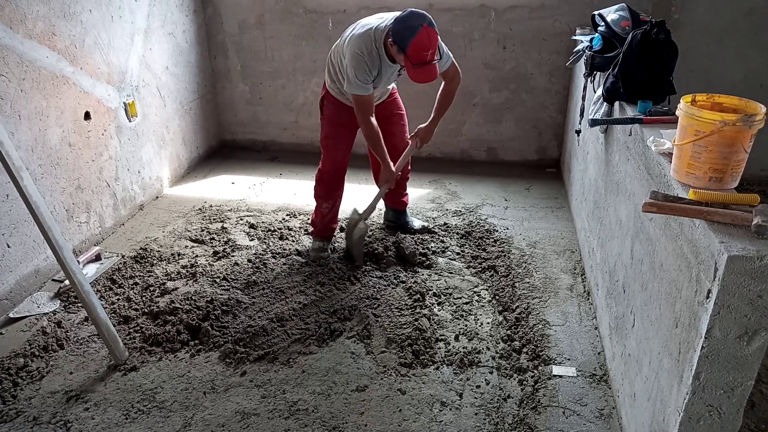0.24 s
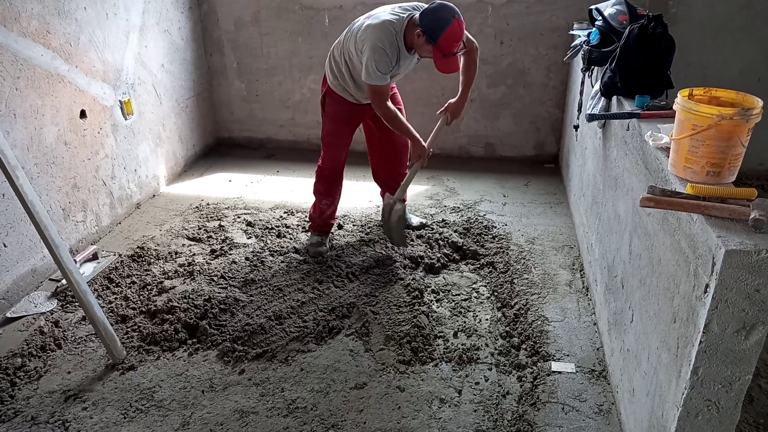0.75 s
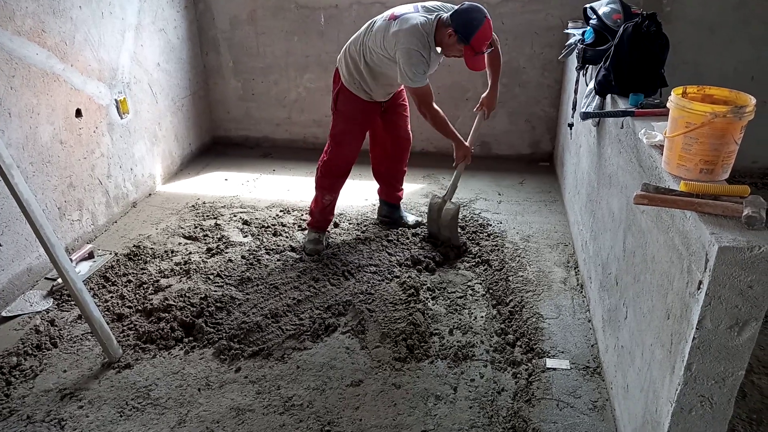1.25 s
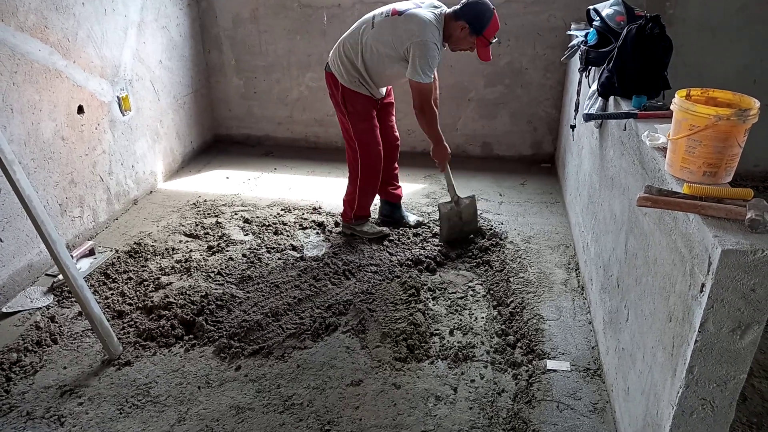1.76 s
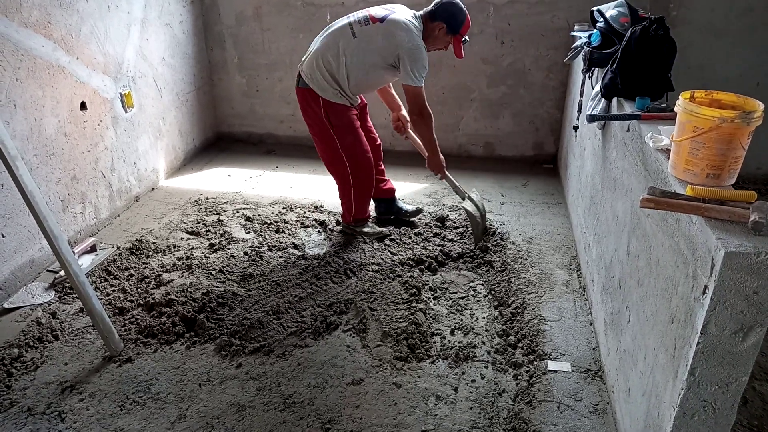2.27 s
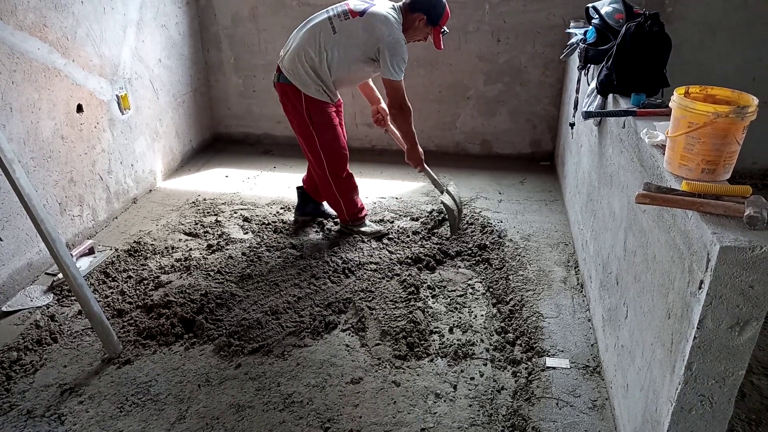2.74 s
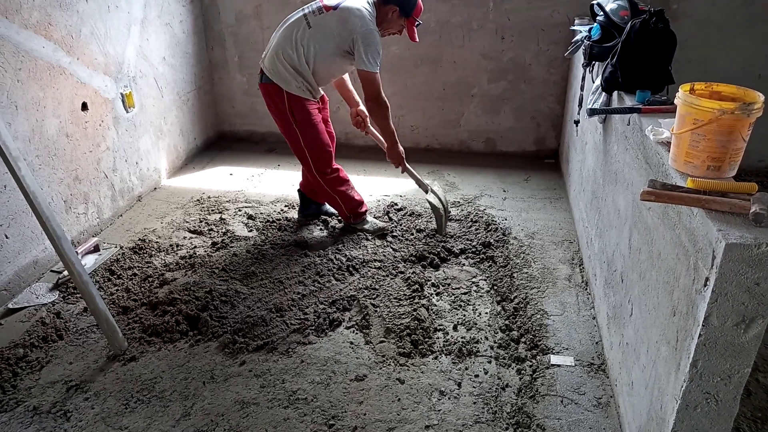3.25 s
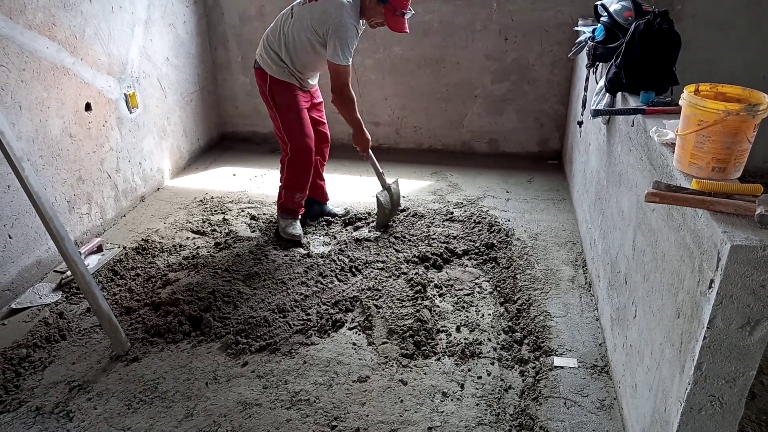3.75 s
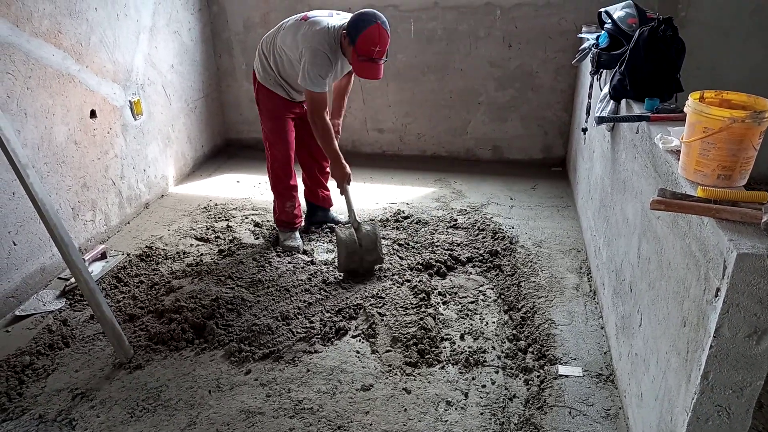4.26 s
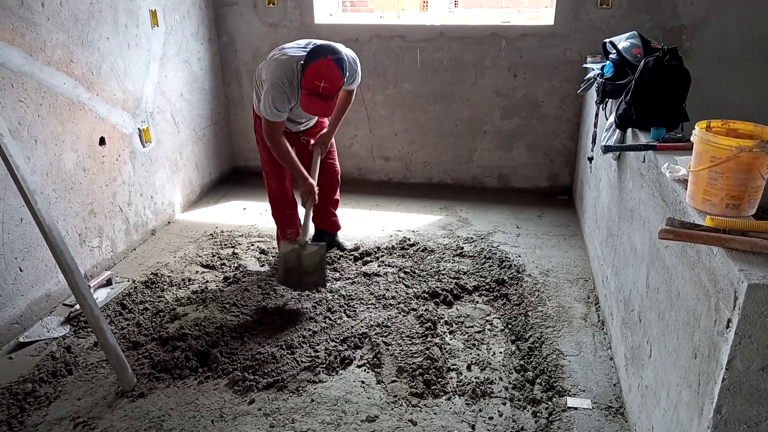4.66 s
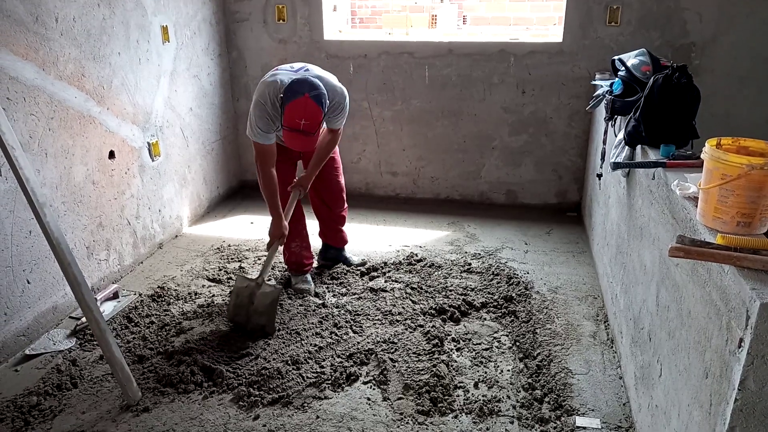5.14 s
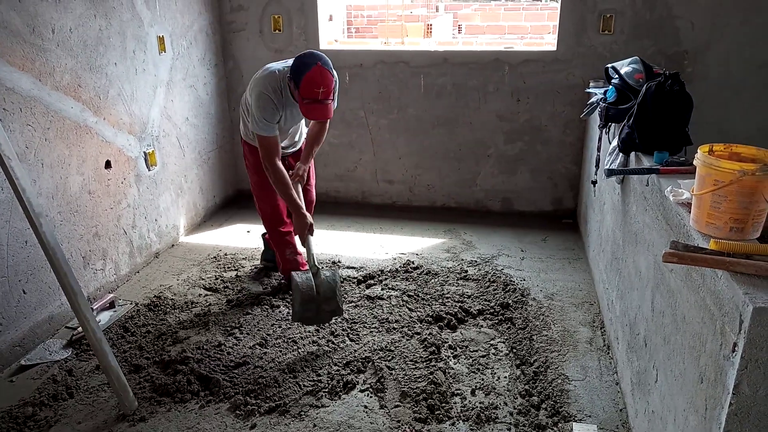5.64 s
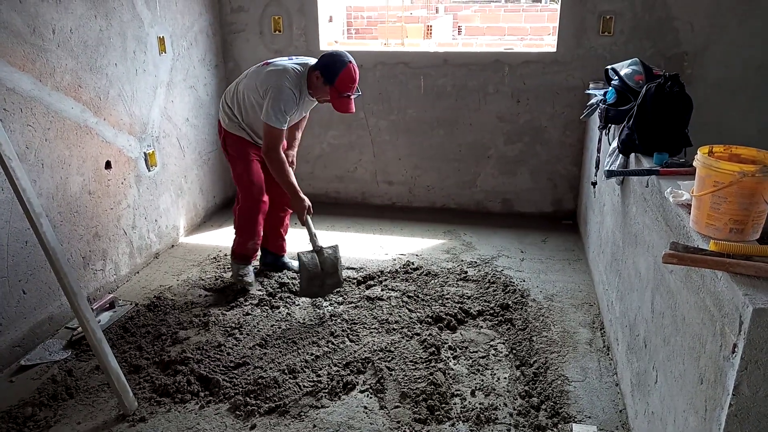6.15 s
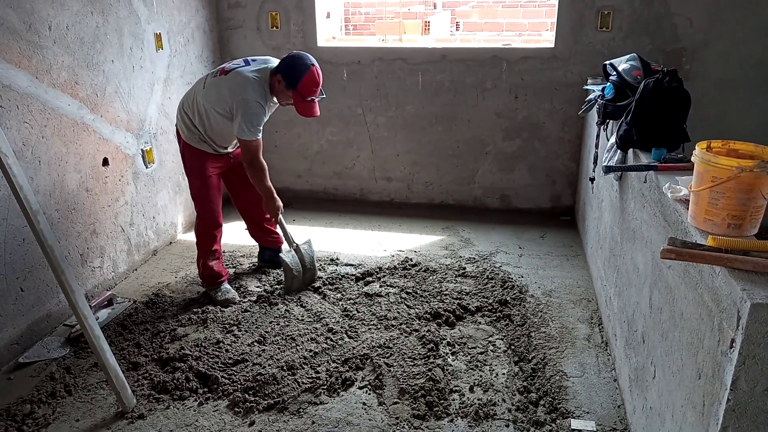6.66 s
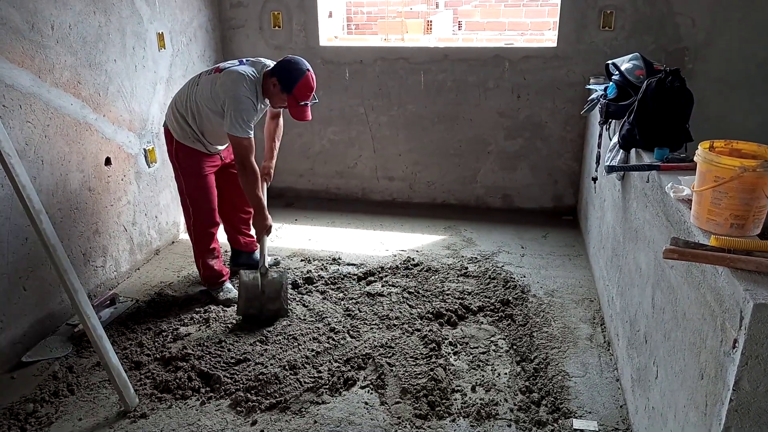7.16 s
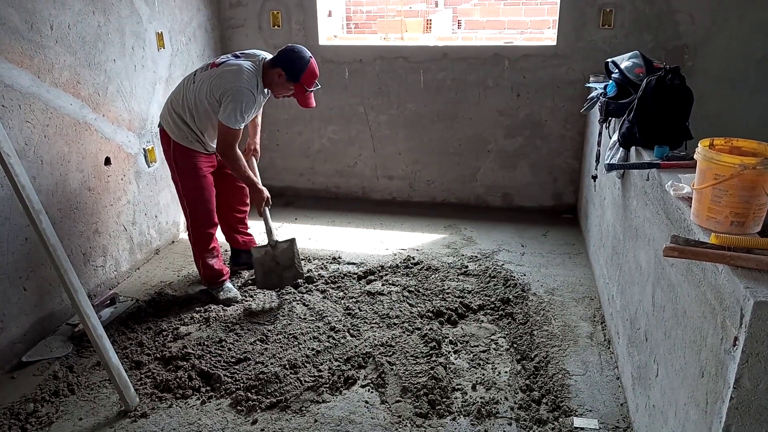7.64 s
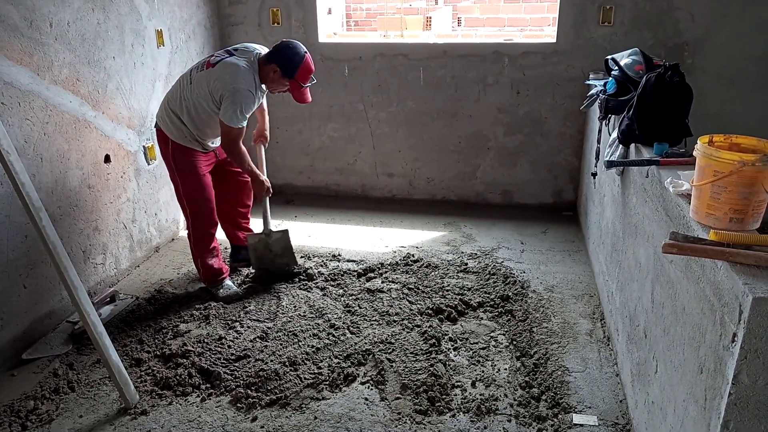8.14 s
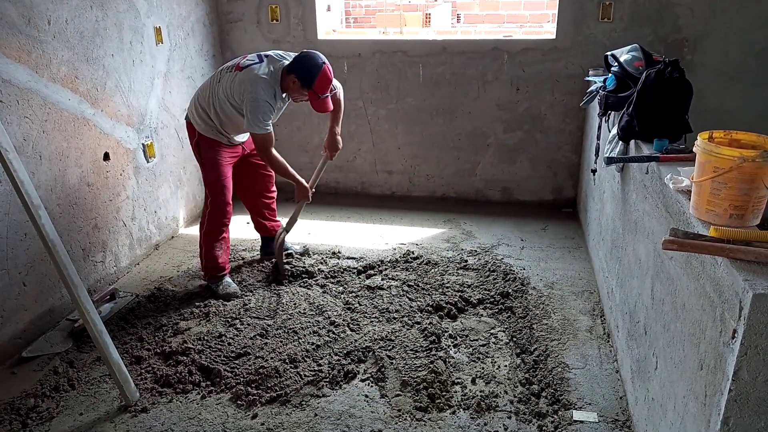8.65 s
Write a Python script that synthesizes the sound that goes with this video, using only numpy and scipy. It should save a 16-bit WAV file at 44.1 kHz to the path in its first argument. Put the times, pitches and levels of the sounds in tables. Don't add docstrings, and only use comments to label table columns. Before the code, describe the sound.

A steel shovel clangs on a concrete slab and scrapes through damp mortar in a bare, echoing room, with small handle squeaks and soft lumps dropping.

```python
import sys
import numpy as np
from scipy import signal
from scipy.fft import rfft, irfft, next_fast_len
from scipy.io import wavfile
from scipy.ndimage import uniform_filter1d, map_coordinates

SR = 44100
rng = np.random.default_rng(int(sys.argv[2]) if len(sys.argv) > 2 else 0)


def digitize_waveform(pressure):
    field = np.atleast_2d(pressure).T
    bounded = np.clip(field, -1, 1)
    quanta = np.round(bounded * 32767).astype(np.int16)
    wavfile.write(sys.argv[1], SR, quanta)


def invert_db(level):
    return 10 ** (np.asarray(level, dtype=float) / 20)


N = 392490
STEP = 16


def unit(x):
    return x / np.sqrt(np.mean(x ** 2) + 1e-20)


def along(points, hz):
    f, v = np.transpose(points)
    return np.interp(np.log(hz + 1), np.log(f + 1), v)


def filtered(x, response):
    m = next_fast_len(len(x) + 8192)
    return irfft(rfft(x, m) * response(np.fft.rfftfreq(m, 1 / SR)), m)[:len(x)]


def coloured(x, spectrum):
    return unit(filtered(x, lambda f: invert_db(along(spectrum, f))))


def modes(table):
    def response(f):
        return sum((-1) ** k * invert_db(db) * 1j * f * w / (c * c - f * f + 1j * f * w)
                   for k, (c, w, db) in enumerate(table))
    return response


def steep(f, hz, width, db):
    return modes([(hz, width, db)])(f) * modes([(hz, 5 * width, 0)])(f)


def wobble(rate):
    knots = rng.standard_normal(int(N * rate / SR) + 4)
    return map_coordinates(knots, [np.arange(N) * rate / SR])


def grains(n, share, spread_db):
    draw = rng.random((3, n))
    size = invert_db(-spread_db * np.log(draw[2] + 0.009))
    return unit((draw[0] < share) * np.sign(draw[1] - .5) * size)


def patchy(x, depth_db):
    z = signal.stft(x, nperseg=512)[2]
    field = uniform_filter1d(rng.standard_normal(z.shape), 9, 0)
    field = uniform_filter1d(field, 7, 1)
    return unit(signal.istft(z * invert_db(depth_db * unit(field)), nperseg=512)[1][:len(x)])


def even(x):
    z = rfft(x)
    return irfft(z / np.sqrt(uniform_filter1d(np.abs(z) ** 2, size=9) + 1e-12), len(x))


def burst(s, db, rise_s, fall_db_per_s):
    since = np.clip(np.arange(0, N + STEP, STEP) / SR - s, 0, 2)
    return (invert_db(db - fall_db_per_s * since) * (1 - np.exp(-since / rise_s))) ** 2


def gain(power):
    return np.interp(np.arange(N) / STEP, np.arange(len(power)), np.sqrt(power))


def add(track, s, x):
    part = track[round(s * SR):][:len(x)]
    part += x[:len(part)]


# frequency_hz, t60_s
WALL_DECAY = [(300, 1), (1500, 0.54), (3500, 0.3), (8000, 0.22), (15000, 0.088)]


def room(x, wet_db):
    hz, t, z = signal.stft(rng.standard_normal(SR // 2), SR, nperseg=256)
    decay = invert_db(-60 * t / along(WALL_DECAY, hz)[:, None])
    tail = signal.istft(z * decay, SR, nperseg=256)[1]
    tail = np.pad(tail / np.linalg.norm(tail), (round(.005 * SR), 0))
    tail[0] = invert_db(-wet_db)
    return invert_db(wet_db) * signal.fftconvolve(x, tail)


# frequency_hz, density_db_per_hz
OUTDOOR_SPECTRUM = [(180, -28.5), (270, -13.5), (355, -7.5), (450, -8), (600, -49), (900, -9), (1250, -2.5),
                    (2500, -5.5), (5500, -14), (12000, -28), (15000, -19), (16000, -41)]


def outdoors():
    return invert_db(-48.0 + 0.2 * wobble(2.9)) * coloured(rng.standard_normal(N), OUTDOOR_SPECTRUM)


# loudest_s, slump_level_db, room_boom_level_db
LUMP_LANDINGS = [(0.22, -51.5, -67), (0.35, -56.5, -79), (0.64, -49, -63.5), (1.0, -52, -70),
                 (1.48, -53.5, -68), (1.96, -47.5, -63.5), (2.3, -51.5, -69), (2.65, -52.5, -76),
                 (3.15, -79, -73), (3.37, -62, -83), (3.85, -82, -76), (4.29, -53.5, -77),
                 (4.56, -56.5, -74), (4.93, -73, -71), (5.06, -56, -81), (5.45, -48, -80), (5.55, -65, -69),
                 (5.9, -61, -70), (6.17, -80, -68), (6.32, -59, -68), (6.6, -55, -68), (6.82, -52, -73),
                 (7.21, -48.5, -63.5), (7.58, -50, -80), (7.93, -50, -83), (8.08, -52, -67.5),
                 (8.3, -56, -80), (8.55, -55, -72), (8.8, -51, -70)]
# frequency_hz, density_db_per_hz
SLUMP_SPECTRUM = [(120, -57), (205, -29), (245, -2.5), (300, -4), (355, 4.5), (420, -1), (520, 1.5),
                  (650, 1), (900, -50), (1500, -90)]
# frequency_hz, density_db_per_hz
BOOM_SPECTRUM = [(15, -30), (25, -8), (32, -14), (60, -7), (97, -7.5), (130, -11), (162, 6), (210, -13),
                 (270, -37), (460, -120)]


def heap():
    rise_s = 0.083
    wet, low = invert_db(-72) ** 2, invert_db(-84) ** 2
    for s, slump_db, boom_db in LUMP_LANDINGS:
        wet = wet + burst(s - rise_s, slump_db + 3.5, rise_s, fall_db_per_s=40.5)
        low = low + burst(s - rise_s, boom_db + 7.5, rise_s, fall_db_per_s=60)
    lumps = grains(N, share=.01, spread_db=0.0)
    slump = gain(wet) * invert_db(4.0 * wobble(24)) * coloured(lumps, SLUMP_SPECTRUM)
    boom = gain(low) * invert_db(7.1 * wobble(6.9)) * coloured(rng.standard_normal(N), BOOM_SPECTRUM)
    return slump + boom


# loudest_s, lead_in_s, pitch_hz, level_db, overtones_db
SOCKET_SLIPS = [(0.155, 0.01, 2920, -39.5, 9), (0.951, 0.043, 2955, -41.5, 11),
                (0.993, 0.011, 2925, -47, -9), (1.639, 0.008, 2990, -59, -5),
                (1.701, 0.026, 2960, -43.5, -13), (2.133, 0.012, 2998, -41, -2),
                (3.274, 0.025, 3005, -56, 15), (4.02, 0.008, 2900, -59, -7), (6.342, 0.02, 3030, -49.5, -7),
                (7.066, 0.016, 3066, -50, 8), (7.861, 0.057, 2950, -43, 4), (8.351, 0.012, 3060, -45.5, 4)]
# loudest_s, lead_in_s, pitch_hz, level_db, overtones_db
ROUGH_SLIPS = [
    (5.42, 0.015, 3000, -47, -8),
    (6.07, 0.015, 3110, -51.5, -8),
]
# multiple, level_db
SLIP_OVERTONES = [(1, 9.5), (2, -14), (3, -34), (4, -28), (5, -24)]


def squeaks():
    tail_s, sag_hz = 0.018, 61
    out = np.zeros(N)
    slips = [(*row, 18) for row in SOCKET_SLIPS] + [(*row, 400) for row in ROUGH_SLIPS]
    for s, lead, hz, db, harsh_db, waver_hz in slips:
        t = np.arange(-lead, tail_s, 1 / SR)
        before = np.clip(-t / lead, 0, 1)
        scatter = waver_hz * unit(uniform_filter1d(rng.standard_normal(len(t)), size=40))
        turn = 2 * np.pi * np.cumsum(hz + sag_hz * before + scatter) / SR
        tone = sum(invert_db(g + harsh_db * (k > 1)) * np.sin(k * turn) for k, g in SLIP_OVERTONES)
        fade = np.clip(np.minimum(t + lead, tail_s - t) / .003, 0, 1)
        level_db = db + 5.5 - 10.5 * before - 900 * np.maximum(t, 0)
        level_db += 1.3 * unit(uniform_filter1d(rng.standard_normal(len(t)), size=150))
        add(out, s - lead, room(invert_db(level_db) * fade * tone, wet_db=-6.5))
    return out


# start_s, peak_db, edge_hz, pan_mode_db, grit_db
HARD_BLOWS = [(0.0, -12.5, 3390, -9.5, -22), (0.652, -11.5, 4270, -2, -35),
              (1.4497, -13.5, 3140, -6, -10.5), (1.941, -14, 2750, -2, -5.5),
              (2.2677, -13.5, 4950, -21, -12), (2.5618, -9, 4050, -3.5, -2.5), (3.031, -7, 3475, -15, -24),
              (3.6348, -18.5, 2940, -12, -14), (4.5076, -6.5, 3480, -15, -41),
              (5.451, -7.5, 3530, -6.5, -6.5), (6.0902, -7, 3476, -10.5, -21), (6.809, -7.5, 2940, -9, -17),
              (7.5797, -9.5, 3990, -0.5, -31)]


def blow_dip_db():
    s = np.array([row[0] for row in HARD_BLOWS])
    t = np.arange(N) / SR
    since = t - s[np.maximum(np.searchsorted(s, t) - 1, 0)]
    return -9 * np.exp(-np.abs(since) / .09) * (since >= 0)


# start_s, level_db
GRAIN_SNAPS = [
    (2.172, -41),
    (4.488, -42),
    (4.905, -59),
    (5.165, -43),
    (5.7, -43),
    (7.08, -55),
    (7.835, -46),
    (8.19, -56),
]
# start_s, length_s, bite_db, push_db, blade_drag_over_grit_db
MORTAR_STROKES = [(0.27, 0.03, -47, -52, -1), (0.29, 0.4, -38.5, -46, 4.5), (1.008, 0.42, -42.5, -47.5, 3),
                  (1.755, 0.13, -45, -42.5, 6), (2.163, 0.04, -42, -55, -6), (2.335, 0.19, -48, -45.5, 4.5),
                  (2.822, 0.36, -37.5, -51.5, 6.5), (3.327, 0.29, -44.5, -45.5, 4),
                  (3.7, 0.24, -52, -61, -18), (4.233, 0.3, -35.5, -43, 4.5), (4.366, 0.05, -44, -42, 1),
                  (4.884, 0.039, -73, -58, 18), (4.991, 0.53, -43.5, -41, 3),
                  (5.804, 0.27, -35, -43.5, 2.5), (6.34, 0.23, -53.5, -53.5, 5),
                  (6.443, 0.06, -39.5, -41, 4.5), (6.515, 0.22, -61.5, -36.5, 3.5),
                  (7.062, 0.05, -52.5, -56, 13.5), (7.152, 0.026, -46, -41, -1), (7.167, 0.41, -36, -41, 4),
                  (7.895, 0.24, -39.5, -38.5, 4), (8.172, 0.08, -57, -57, 11.5), (8.36, 0.17, -62, -51, 1),
                  (8.497, 0.79, -43, -47.5, 4)]
# start_s, grit_db, blade_drag_db, fall_db_per_s
EDGE_SKIDS = [(0.0, -38.5, -23, 136), (0.655, -41, -28.5, 102), (1.45, -45.5, -37, 65),
              (1.944, -45, -23, 263), (2.27, -35.5, -21.5, 200), (2.565, -57, -20.5, 150),
              (3.034, -41.5, -27, 103), (3.635, -47.5, -47, 153), (4.508, -36.5, -24, 159),
              (5.452, -48.5, -38.5, 22), (6.09, -38, -27, 126), (6.815, -37.5, -29, 123),
              (7.582, -45, -33, 110)]


def rubbing():
    rise_s = 0.012
    t = np.arange(0, N + STEP, STEP) / SR
    grit = drag = invert_db(-67) ** 2
    fizz = sum(burst(row[0], row[1] - 31, 0.00033, 704) for row in HARD_BLOWS)
    fizz = fizz + sum(burst(s, db, .002, 900) for s, db in GRAIN_SNAPS)
    for s, length, bite_db, push_db, drag_db in MORTAR_STROKES:
        arch_db = -9 * (2 * np.clip((t - s) / length, 0, 1) - 1) ** 2
        arch_db = arch_db - 120 * np.clip(t - s - length, 0, 1)
        bite = burst(s, bite_db + 5.5, rise_s, fall_db_per_s=175)
        power = bite + burst(s, push_db, rise_s, 0) * invert_db(arch_db) ** 2
        grit = grit + power
        drag = drag + burst(s, drag_db - 0.5, rise_s, 0) * power
        fizz = fizz + burst(s, bite_db - 14, 0.0054, fall_db_per_s=211)
    for s, grit_db, drag_db, fall in EDGE_SKIDS:
        grit = grit + burst(s, grit_db, 0.00067, fall)
        drag = drag + burst(s, drag_db, 0.0013, fall)
    return gain(grit), gain(drag), gain(fizz)


# frequency_hz, density_db_per_hz
GRIT_SPECTRUM = [(1200, -54), (2100, -18), (3000, -11.5), (4300, -1.5), (7400, -4.5), (10500, -10),
                 (13300, -14), (15300, -10), (16000, -12.5)]
# frequency_hz, width_hz, level_db
DRAG_MODES = [(709, 237, 2.5), (1170, 1330, 1), (2220, 480, 5.5), (3460, 1080, 4.5), (4270, 1710, -3.5)]
# frequency_hz, density_db_per_hz
FIZZ_SPECTRUM = [(3000, -22), (6000, -18), (9000, -2), (12000, -0.5), (14000, 20), (15800, 6.5)]


def strokes():
    grit_gain, drag_gain, fizz_gain = rubbing()
    clumps_db = 1.5 * wobble(45)
    sand = patchy(grains(N, share=.2, spread_db=3), depth_db=1.3)
    stones = 0.5 * grains(N, share=.004, spread_db=0.5)
    grit = grit_gain * invert_db(2.5 + clumps_db) * coloured(sand, GRIT_SPECTRUM)
    blade = unit(filtered(sand + stones, modes(DRAG_MODES)))
    drag = drag_gain * invert_db(clumps_db - 1.5 + blow_dip_db()) * blade
    return room(grit + drag + fizz_gain * coloured(sand, FIZZ_SPECTRUM), wet_db=-14.5)[:N]


CLEAN_WIDTH_HZ, PAN_HZ = 189, 1551
# partner_hz, partner_re_edge_db, upper_hz, upper_re_edge_db
BLOW_SIDE_MODES = [(2370, 2, 7200, -12), (3300, -1, 12000, -43), (3950, 2.5, 7500, -14.5),
                   (3870, -2, 4500, -3), (5900, -8, 10500, -16), (3300, -5, 4500, -10),
                   (4250, -20, 4960, -11), (3480, 2, 7550, -16), (4100, -10, 7300, -12.5),
                   (3800, -23, 6500, -9.5), (4460, -18, 6900, -15), (3383, -2, 5700, -9.5),
                   (4400, -5.5, 7300, -25)]
# start_s, peak_db, edge_hz, pan_mode_db, shaft_mode_db
LIGHT_TAPS = [(0.949, -23, 2900, -5, -18), (1.6904, -36, 2880, -28, -33), (1.943, -35.5, 4800, -10, 5),
              (2.171, -20, 2900, -27, -25), (2.7587, -28.5, 4240, -2, -25), (2.828, -28.5, 4470, -18, -18),
              (3.27, -24.5, 2970, -34, -48), (4.2433, -32.5, 4950, 5, 3), (4.9018, -44, 4530, -4, 5.5),
              (5.6996, -44.5, 3300, 1, 9.5), (5.8165, -23, 4150, -20, -8), (7.0794, -36.5, 4760, 5, 1),
              (7.582, -37, 4400, 8, 7.5), (7.8344, -25.5, 2860, -30, -9), (8.21, -42, 3400, 2, 0),
              (8.3443, -27.5, 3090, -3, -39), (8.348, -26.5, 5140, -13, -18),
              (8.5111, -33.5, 3650, -7.5, 1.5)]


def contacts():
    hits = []
    for (s, db, hz, pan_db, grit_db), side in zip(HARD_BLOWS, BLOW_SIDE_MODES):
        width_hz = np.clip(CLEAN_WIDTH_HZ + 62 * (-6.5 - db), 120, 754)
        shaft_db = -19 - 0.0515 * (width_hz - CLEAN_WIDTH_HZ)
        hits.append((s, db, hz, width_hz, PAN_HZ, pan_db, grit_db, shaft_db, side))
    for s, db, hz, pan_db, shaft_db in LIGHT_TAPS:
        side = (1.14 * hz, -29.5, 7880, -8)
        hits.append((s, db, hz, 350, 1900, pan_db, -22, shaft_db, side))
    return hits


FREE_MODES = [1410, 1465, 1579, 1683, 2880, 2990, 3370, 3510, 3400, 3550, 3480, 3770, 4020, 4280]


def ringing():
    free_db, free_pan_db, t60_s = -21, -17, 0.55
    out, t = np.zeros(N), np.arange(SR // 2) / SR
    for s, db, hz, damping, _, pan_db, _, _, (mate_hz, mate_db, *_) in contacts()[:len(HARD_BLOWS)]:
        for free_hz in FREE_MODES:
            drive = steep(free_hz, hz, 230, free_db) - steep(free_hz, mate_hz, 230, free_db + mate_db)
            size = np.abs(drive + steep(free_hz, PAN_HZ, 190, pan_db + free_pan_db))
            drift = np.cumsum(rng.normal(0, 0.0062, len(t)))
            turn = 2 * np.pi * (free_hz * (1 + rng.normal(0, 0.00594)) * t + drift)
            decay = invert_db(db + rng.normal(0, 1.85) - 60 * t / t60_s) * (1 - np.exp(-t / 0.0042))
            add(out, s, size * CLEAN_WIDTH_HZ / damping * decay * np.sin(turn))
    return out


# frequency_hz, level_db
CRACK_SPECTRUM = [(300, -36), (900, 33), (2500, 23), (5500, -43), (7500, 23), (9000, 9), (12000, 9),
                  (16000, -28)]


def blows():
    out, t = np.zeros(N), np.arange(SR // 10) / SR
    contact = (1 - np.exp(-t / 0.002)) * np.exp(-(t / 0.012) ** 2)
    for s, db, hz, damping, pan_hz, pan_db, grit_db, shaft_db, side in contacts():
        mate_hz, mate_db, upper_hz, upper_db = side
        chatter = even(grains(len(t), share=.06, spread_db=4) * contact) * (t < .05)
        edge = filtered(chatter, lambda f: steep(f, hz, damping, 0) - steep(f, mate_hz, damping, mate_db))
        pan = filtered(chatter, lambda f: steep(f, pan_hz, 0.88 * damping, 0)
                       - steep(f, pan_hz * 1.22, 390, -9))
        upper = filtered(chatter, lambda f: steep(f, upper_hz, 700, 0))
        shaft = filtered(chatter, modes([(790, 120, -1), (339, 82, -15.5)]))
        crack = coloured(grains(len(t), share=0.37, spread_db=2.5) * contact, CRACK_SPECTRUM)
        parts = [(edge, 0), (pan, pan_db - 2), (crack, grit_db - 7.5), (shaft, shaft_db), (upper, upper_db)]
        hit = sum(invert_db(db + part_db - 2.0) * p / np.abs(p).max() for p, part_db in parts)
        wet_db = -1.5 - 0.0097 * (damping - CLEAN_WIDTH_HZ)
        add(out, max(s - .002, 0), room(hit, wet_db))
    return out


def scene():
    return (outdoors() + heap() + squeaks() + strokes() + ringing() + blows())[None]


def band_limit(x):
    return signal.sosfilt(signal.butter(12, 16860, fs=SR, output="sos"), x)


def record(dry):
    ceiling, low_hz, top_hz = .43, 70, 15850
    held = dry[0] / (1 + np.abs(dry[0] / ceiling) ** 6) ** (1 / 6)
    heard = filtered(held, lambda hz: (hz < top_hz) * hz ** 2 / (hz ** 2 + low_hz ** 2))
    return band_limit(heard[None])


dry = scene()
out = record(dry)
digitize_waveform(out)
```